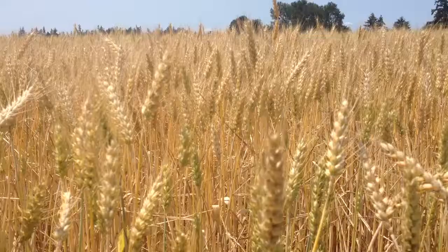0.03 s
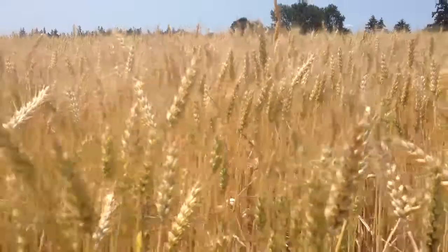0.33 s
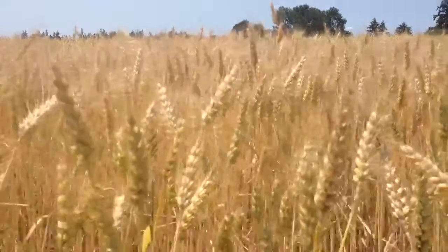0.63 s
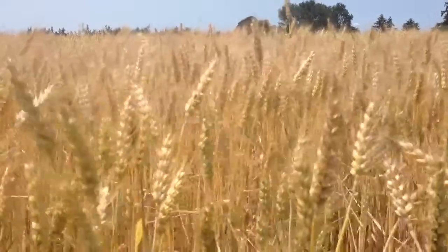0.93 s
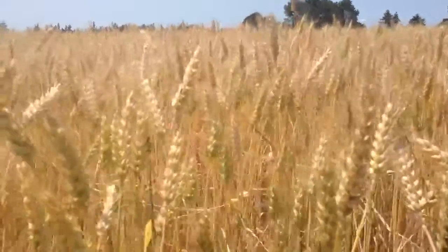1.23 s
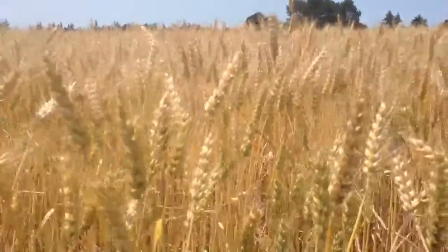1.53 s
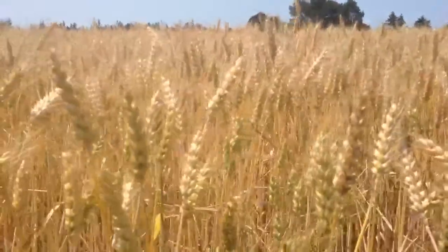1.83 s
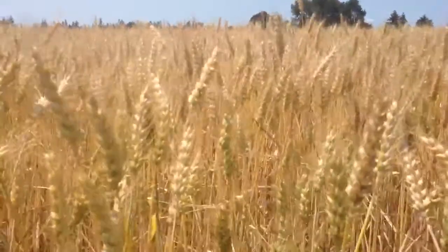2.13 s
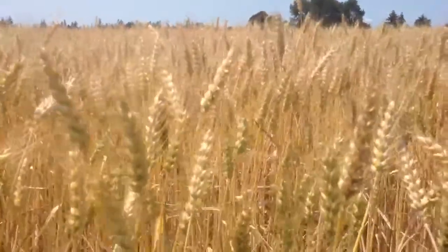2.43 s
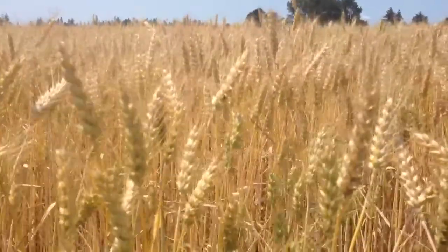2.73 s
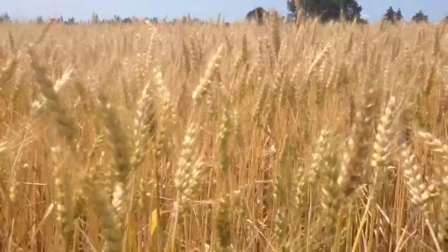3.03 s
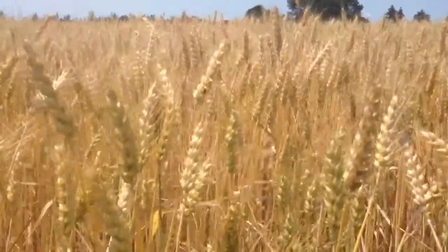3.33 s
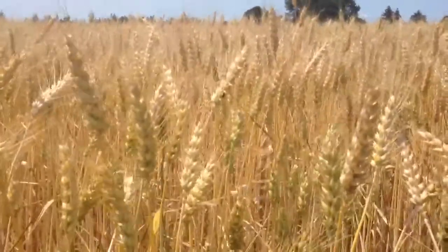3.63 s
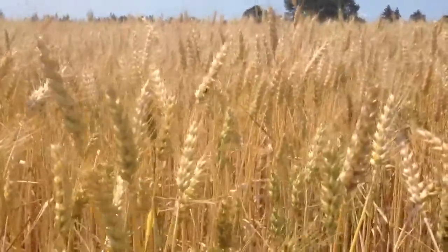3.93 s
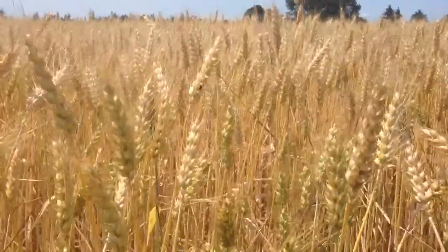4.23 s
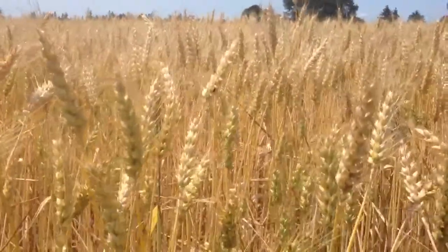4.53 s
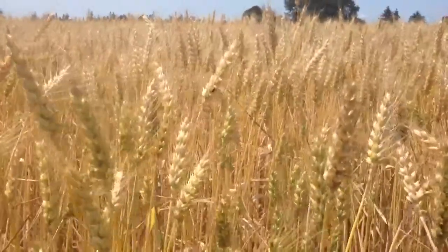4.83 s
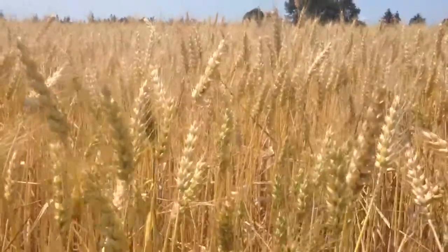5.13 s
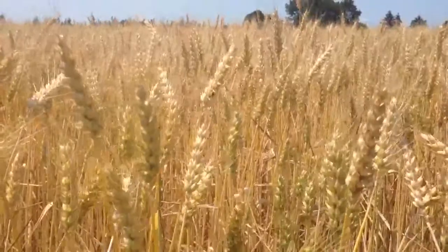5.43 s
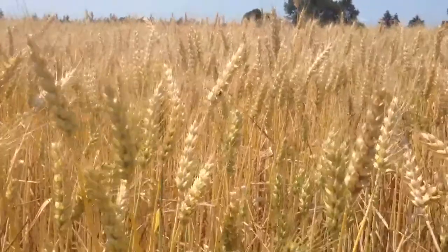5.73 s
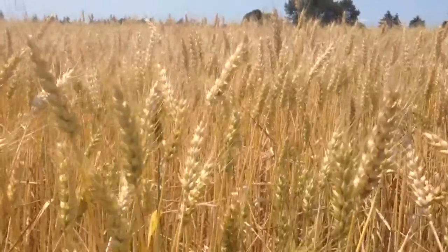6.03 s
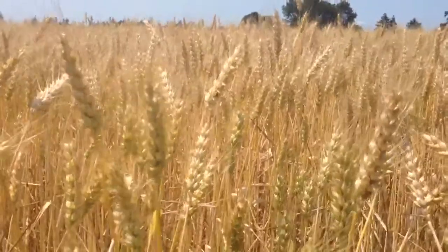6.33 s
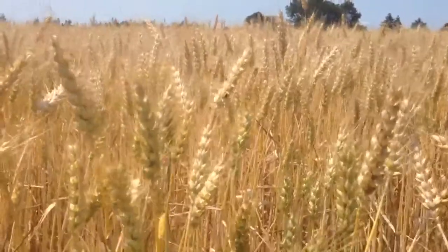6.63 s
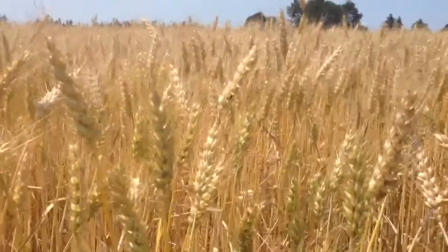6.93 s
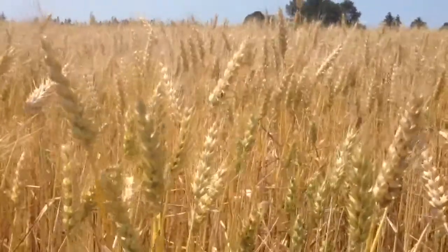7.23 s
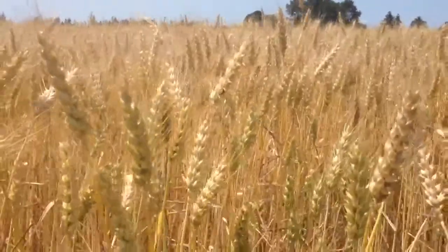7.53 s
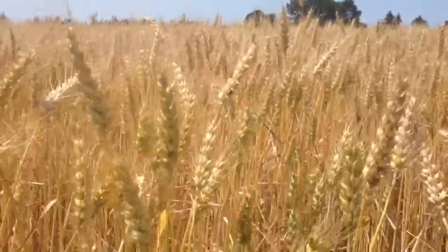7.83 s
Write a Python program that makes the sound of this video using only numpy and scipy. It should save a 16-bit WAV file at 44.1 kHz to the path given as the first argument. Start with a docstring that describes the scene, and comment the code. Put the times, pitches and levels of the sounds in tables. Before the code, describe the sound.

Two gusts buffet the microphone as ripe wheat rustles, straws snap and a distant road hums faintly.

```python
"""Wind thumps on the microphone over the hiss of a ripe wheat field; its eddies come in two main gusts. Dry
ears and stalks rub and brush, two straws snap, and the camera body takes two light knocks. A grasshopper rasps
early on and a small bird chirps once. Far traffic drones throughout, swelling towards the end with a faint tyre
whine."""
import sys
import numpy as np
from scipy import signal
from scipy.fft import rfft, irfft, next_fast_len
from scipy.io import wavfile
from scipy.ndimage import uniform_filter1d

SR = 44100
rng = np.random.default_rng(int(sys.argv[2]) if len(sys.argv) > 2 else 0)


def master(y):
    """Save y as 16-bit WAV."""
    cut = np.clip(np.atleast_2d(y).T, -1, 1)
    pcm = np.round(cut * 32767)  # scale
    wavfile.write(sys.argv[1], SR, pcm.astype(np.int16))


N = 357210
TIME_S = np.arange(N) / SR

# Table levels are relative; each source adds its own gain.
# gusts at the microphone: (centre time [s], level [dB], half-length [s])
GUST_SWELLS = [(0.43, -31.5, 0.23), (1.277, -41, 0.2), (1.87, -53.5, 0.17), (3.547, -53.5, 0.082),
               (4.5, -56.5, 0.36), (5.354, -57.5, 0.09), (7.06, -46.5, 0.13)]
# big eddies, one thump each: (centre time [s], level [dB], half-length [s], pitch reach [Hz])
BIG_EDDIES = [(0.133, -27.5, 0.026, 283), (0.188, -20.5, 0.011, 300), (0.282, -18, 0.011, 318),
              (0.358, -25.5, 0.015, 285), (0.417, -20.5, 0.012, 390), (0.521, -16.5, 0.011, 440),
              (0.573, -37, 0.0021, 380), (0.62, -22, 0.006, 333), (0.986, -24, 0.009, 229),
              (1.046, -25.5, 0.0081, 242), (1.088, -25, 0.016, 293), (1.196, -26.5, 0.0095, 225),
              (1.247, -30.5, 0.004, 360), (1.31, -33.5, 0.0061, 240), (1.359, -38, 0.0046, 373),
              (1.443, -38, 0.019, 207), (1.541, -33.5, 0.0047, 221), (1.844, -41.5, 0.021, 233),
              (2.019, -32.5, 0.011, 227), (6.881, -36, 0.009, 260), (6.93, -41.5, 0.031, 198),
              (7.032, -32.5, 0.0047, 210), (7.078, -27, 0.013, 209), (7.136, -32.5, 0.0092, 180),
              (7.357, -38, 0.006, 180), (7.431, -40.5, 0.01, 218), (7.464, -38.5, 0.0038, 250)]
# hiss of the breeze over the field: (time [s], level [dB])
BREEZE_LEVEL = [(0.4, -57.5), (1.06, -57.5), (2.69, -64.5), (3.85, -68), (5.35, -65.5), (6.13, -64),
                (6.83, -61), (8.1, -61)]
# rubbing stalks: (frequency [Hz], level [dB])
STALK_SPECTRUM = [(710, -26), (1200, -8), (1300, -12), (1570, -3.5), (2130, -1.5), (3230, -4.5),
                  (4610, -1.5), (5390, -8.5), (6000, -9.5), (7800, -27), (13200, -120)]
# rubbing awns, the bristles of the ears: (frequency [Hz], level [dB])
AWN_SPECTRUM = [(3180, -23), (5400, -10), (7310, 0.5), (9770, -3.5), (12200, 1), (14600, -1), (15200, -1)]
# far road noise: (time [s], level [dB])
ROAD_LEVEL = [(2.2, -62.5), (3.48, -64), (4.9, -62), (5.52, -62.5), (6.96, -57), (7.54, -59.5), (8.1, -53)]
# engine rumble: (frequency [Hz], level [dB])
ENGINE_SPECTRUM = [(24, -55), (40, -30), (86, -19.5), (105, -8), (119, -2.5), (193, -3), (237, -3.5),
                   (291, -11.5), (360, -14.5), (600, -24), (780, -33), (1320, -120)]
# tyre roar: (frequency [Hz], level [dB])
ROAD_SPECTRUM = [(180, -23), (300, 1.5), (472, -3), (636, -1.5), (756, -3.5), (891, -3), (1080, -6.5),
                 (1290, -7), (1470, -11), (3000, -20.5), (3900, -53), (6600, -120)]
# tyre whine: (time [s], level [dB])
WHINE_LEVEL = [(5.1, -78), (5.8, -68), (6.35, -67), (6.68, -58.5), (6.88, -58), (7.05, -68), (8.1, -63.5)]
# knocks on the camera body: (time [s], level [dB])
BODY_KNOCKS = [(0.1408, -31), (5.6003, -41)]
# ears brushing close by: (time [s], level [dB])
EAR_BRUSHES = [(0.812, -34), (1.421, -39.5), (1.85, -40), (2.317, -37), (2.775, -40), (4.038, -41),
               (4.642, -42), (5.354, -39), (6.576, -40), (7.041, -31)]
# the bird's three rising notes: (centre time [s], pitch [Hz], level [dB])
BIRD_NOTES = [(2.176, 1780, -64), (2.213, 2050, -51.5), (2.252, 2300, -65)]
# dry straws snapping: (time [s], level [dB], ring frequency [Hz])
STRAW_SNAPS = [(2.5826, -38.5, 4100), (2.6539, -21, 7500)]


def from_db(db):
    """Decibels to gain."""
    return 10 ** (np.asarray(db) / 20)


def rms_one(x):
    """Scale to rms 1."""
    return x / np.sqrt(np.mean(x ** 2) + 1e-20)


def level_curve(rows):
    """Interpolate (time, level) rows at every sample."""
    return np.interp(TIME_S, *np.transpose(rows))


def following(level_db, share):
    """Keep a share of a level's swing about its mean."""
    return level_db.mean() + share * (level_db - level_db.mean())


def bell_power(centre_s, db, half_s):
    """Power of a bell-shaped swell."""
    return from_db(db) ** 2 * np.exp(-np.minimum(((TIME_S - centre_s) / half_s) ** 2, 40))


def drift(rate_hz):
    """Slow random wander, rms 1."""
    hop, settle = 40, 2000
    pole = np.exp(-2 * np.pi * rate_hz * hop / SR)
    noise = rng.standard_normal(N // hop + settle + 2)
    slow = signal.lfilter([1], [1, -2 * pole, pole * pole], noise)[settle:]
    return np.interp(np.arange(N) / hop, np.arange(len(slow)), rms_one(slow))


def butterworth(x, order, hz, kind):
    """Causal Butterworth filter."""
    return signal.sosfilt(signal.butter(order, hz, kind, fs=SR, output="sos"), x)


def resonance(x, hz, width_hz):
    """Two-pole resonance, peak gain 1."""
    radius = np.exp(-np.pi * width_hz / SR)
    feedforward = np.array([1, 0, -1]) * (1 - radius ** 2) / 2
    feedback = [1, -2 * radius * np.cos(2 * np.pi * hz / SR), radius ** 2]
    return signal.lfilter(feedforward, feedback, x + 1e-18)


def coloured(x, spectrum):
    """Shape a steady sound by a spectrum; rms 1."""
    size = next_fast_len(N)
    hz, db = np.transpose(spectrum)
    bins_hz = np.maximum(np.fft.rfftfreq(size, 1 / SR), 1)
    gain_db = np.interp(np.log(bins_hz), np.log(hz), db, left=-120, right=-120)
    return rms_one(irfft(rfft(x, size) * from_db(gain_db), size)[:N])


def crackle(per_s, spread_db):
    """Tiny contacts at random times, most weak, a few strong; rms 1."""
    sizes = from_db(spread_db * np.minimum(rng.exponential(1, N), 5))
    signs = rng.choice([-1, 1], N)
    return rms_one(sizes * signs * (rng.random(N) < per_s / SR))


def buffeting(gust_db, gust_reach_hz, lump_db, lump_hz, rolloff_order, low_cut_hz,
              port_hz, port_width_hz, port_db, smooth_s):
    """Turbulence at the microphone port: slow eddies thud, fast ones swirl finer and reach higher."""
    small_eddies = from_db(gust_db + lump_db * drift(lump_hz))
    power = sum(bell_power(*gust) for gust in GUST_SWELLS) * small_eddies ** 2
    weighted_reach = power * gust_reach_hz
    for centre_s, db, half_s, reach_hz in BIG_EDDIES:
        eddy = bell_power(centre_s, db, half_s)
        power += eddy
        weighted_reach += eddy * reach_hz
    corner_hz = weighted_reach / power   # the strongest eddy sets the colour
    white = rng.standard_normal((2, N))
    swirl = np.zeros(N)
    edges_hz = 25 * 2 ** (np.arange(14) / 2)
    for k, (low_hz, high_hz) in enumerate(zip(edges_hz, edges_hz[1:])):
        band = butterworth(white[k % 2], 3, [low_hz, high_hz], "band")
        swirl += band / np.sqrt(1 + (np.sqrt(low_hz * high_hz) / corner_hz) ** (2 * rolloff_order))
    # the microphone drops deep bass and booms just above its cut
    swirl = butterworth(swirl, 3, low_cut_hz, "high")
    swirl += from_db(port_db) * resonance(swirl, port_hz, port_width_hz)
    # level the swirl so that gusts and eddies alone set the strength
    span = int(smooth_s * SR)
    swirl_power = uniform_filter1d(uniform_filter1d(swirl ** 2, span), span) + 1e-14
    return butterworth(swirl * np.sqrt(power / swirl_power), 2, 85, "high")


def wheat(stalk_db, stalk_follow, awn_db, contacts_per_s, near_share, flutter_db):
    """Far contacts merge into hiss, near ones come in grainy clumps; stiff stalks follow wind less."""
    breeze_db = level_curve(BREEZE_LEVEL)
    sway = drift(rate_hz=9)
    near = crackle(contacts_per_s * from_db(2.8 * sway), spread_db=4)
    rubbing = np.sqrt(near_share) * near + np.sqrt(1 - near_share) * rng.standard_normal(N)
    stalks = coloured(rubbing + 1.55 * rng.standard_normal(N), STALK_SPECTRUM)
    stalks *= from_db(following(breeze_db, stalk_follow) + stalk_db)
    awns = from_db(breeze_db + awn_db + flutter_db * sway) * coloured(rubbing, AWN_SPECTRUM)
    return stalks + awns


def traffic(engine_db, engine_follow, roar_db, whine_db, whine_hz, whine_width_hz, throb_db, throb_hz):
    """Far engines rumble, tyres roar and whine; the whine throbs and wavers in the moving air."""
    road_db = level_curve(ROAD_LEVEL)
    rumble = coloured(rng.standard_normal(N), ENGINE_SPECTRUM)
    rumble *= from_db(following(road_db, engine_follow) + engine_db)
    roar = from_db(road_db + roar_db) * coloured(rng.standard_normal(N), ROAD_SPECTRUM)
    tread = resonance(rng.standard_normal(N), whine_hz, whine_width_hz)
    tread = rms_one(resonance(tread, whine_hz, whine_width_hz))
    waver_db = throb_db * np.cos(2 * np.pi * throb_hz * TIME_S) + 2 * drift(rate_hz=7.2)
    whine = from_db(level_curve(WHINE_LEVEL) + whine_db + waver_db) * tread
    return rumble + roar + whine


def knocks(gain_db, ring_hz, width_hz):
    """Light taps on the camera body, each one heavily damped swing."""
    taps = np.zeros(N)
    for at_s, db in BODY_KNOCKS:
        taps[int(at_s * SR)] = from_db(db + gain_db)
    unit_peak = resonance(signal.unit_impulse(256), ring_hz, width_hz).max()
    return resonance(taps, ring_hz, width_hz) / unit_peak


def flaps(gain_db, tear_hz, db_per_octave, gap_s, half_swing_s, fade_db_per_flap):
    """Fast eddies tear the flow off the microphone's edge; each flap is a brief pressure swing."""
    out = np.zeros(N)
    for centre_s, db, half_s, reach_hz in BIG_EDDIES:
        if reach_hz <= tear_hz:
            continue
        first_db = db + gain_db + db_per_octave * np.log2(reach_hz / tear_hz)
        for k, at_s in enumerate(np.arange(centre_s - half_s, centre_s + half_s, gap_s)):
            span = slice(int((at_s - .005) * SR), int((at_s + .005) * SR))
            offset = (TIME_S[span] - at_s) / half_swing_s
            swing = offset * np.exp((1 - offset ** 2) / 2)
            out[span] += from_db(first_db - fade_db_per_flap * k) * swing
    return butterworth(out + 1e-18, 2, 180, "high")


def grasshopper(at_s, count, ticks_per_s, wing_hz, width_hz, peak_db):
    """One rasp: a quick run of ticks into the wing's resonance."""
    ticks = np.zeros(N)
    times_s = at_s + (np.arange(count) + rng.normal(0, 0.18, count)) / ticks_per_s
    ticks[(times_s * SR).astype(int)] = from_db(rng.normal(0, 1, count))
    rasp = resonance(resonance(ticks, wing_hz, width_hz), wing_hz, width_hz)
    return from_db(peak_db) * rasp / np.abs(rasp).max()


def brushes(gain_db, ring_hz, width_hz, ticks_per_s, decay_s):
    """The bristles of two ears catch and slip: a dying run of fine ticks."""
    out = np.zeros(N)
    ticks = crackle(ticks_per_s, spread_db=2.9)
    for at_s, db in EAR_BRUSHES:
        span = slice(int(at_s * SR), int((at_s + .15) * SR))
        age_s = np.maximum(TIME_S[span] - at_s, 0)
        bristles = resonance(ticks[span] * np.exp(-age_s / decay_s), ring_hz, width_hz)
        out[span] += from_db(db + gain_db) * resonance(bristles, ring_hz, width_hz)
    return out


def bird(half_note_s):
    """A far chirp: short, nearly pure notes, each arching slightly in pitch."""
    out = np.zeros(N)
    for centre_s, top_hz, db in BIRD_NOTES:
        offset = np.clip((TIME_S - centre_s) / half_note_s, -5, 5)
        pitch_hz = top_hz * (1 - 0.022 * offset ** 2)
        out += from_db(db) * np.exp(-offset ** 2) * np.sin(2 * np.pi * np.cumsum(pitch_hz) / SR)
    return out


def snaps(gain_db, ring_q, crack_width_hz):
    """A straw gives way: a sharp crack and a ring of a few cycles."""
    out = np.zeros(N)
    click = signal.unit_impulse(1024)
    for at_s, db, ring_hz in STRAW_SNAPS:
        ring = resonance(click, ring_hz, ring_hz / ring_q)
        crack = resonance(click, 0.66 * ring_hz, crack_width_hz)
        snap = ring / np.abs(ring).max() + crack / np.abs(crack).max()
        start = int(at_s * SR)
        out[start:start + len(snap)] += from_db(db + gain_db) * snap / np.abs(snap).max()
    return out


def scene():
    """Mono mix: wind on the microphone, the field around it, far sounds behind."""
    mix = buffeting(gust_db=-2, gust_reach_hz=195, lump_db=5, lump_hz=25, rolloff_order=3.515,
                    low_cut_hz=128, port_hz=161, port_width_hz=80, port_db=1, smooth_s=0.0094)
    mix += wheat(stalk_db=-2.5, stalk_follow=0.15, awn_db=-0.02, contacts_per_s=400,
                 near_share=0.13, flutter_db=1.07)
    mix += traffic(engine_db=6, engine_follow=0.46, roar_db=2, whine_db=-2, whine_hz=1293,
                   whine_width_hz=66, throb_db=1, throb_hz=11.52)
    mix += knocks(gain_db=5.5, ring_hz=700, width_hz=570)
    mix += flaps(gain_db=-9.5, tear_hz=314, db_per_octave=12, gap_s=0.011,
                 half_swing_s=0.00029, fade_db_per_flap=2)
    mix += grasshopper(at_s=.295, count=7, ticks_per_s=95, wing_hz=7000, width_hz=3400, peak_db=-33)
    mix += brushes(gain_db=-9, ring_hz=13100, width_hz=6100, ticks_per_s=2700, decay_s=0.012)
    mix += bird(half_note_s=0.011)
    mix += snaps(gain_db=-2.5, ring_q=8.9, crack_width_hz=4600)
    return mix[None]


def record(dry):
    """The microphone opens after a moment; the top is cut steeply."""
    open_s, fade_s, cutoff_hz = .119, .003, 15250
    opened = dry * np.clip((TIME_S - open_s) / fade_s, 0, 1)
    return signal.sosfilt(signal.ellip(12, .1, 80, cutoff_hz, fs=SR, output="sos"), opened)


dry = scene()
out = record(dry)
master(out)
```